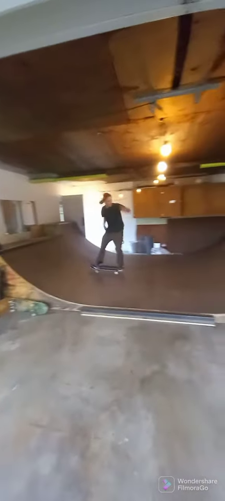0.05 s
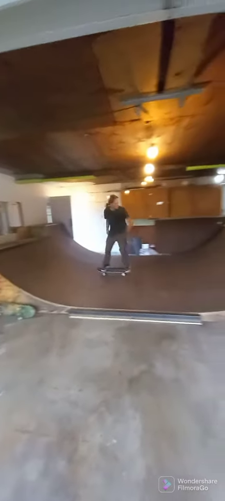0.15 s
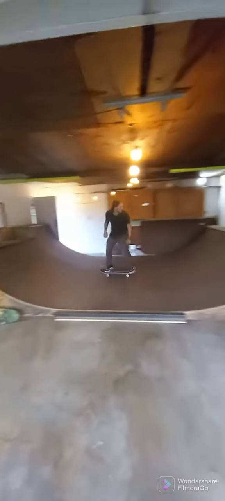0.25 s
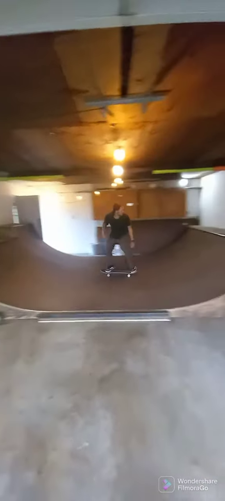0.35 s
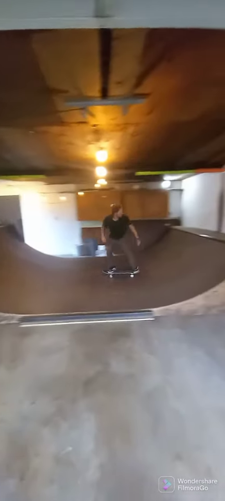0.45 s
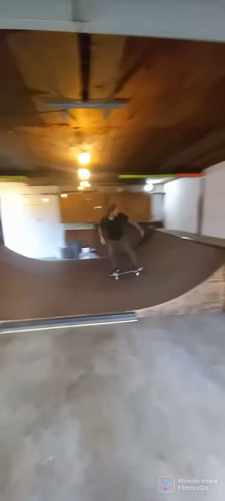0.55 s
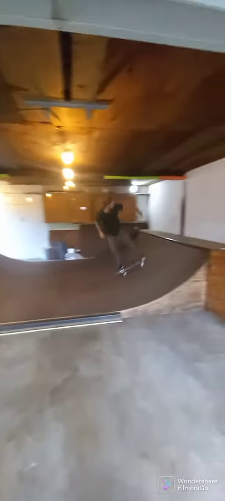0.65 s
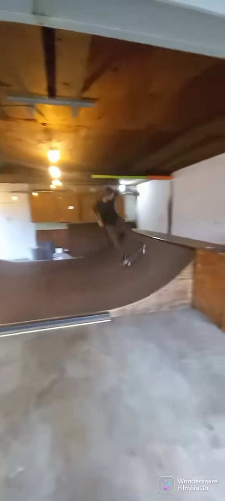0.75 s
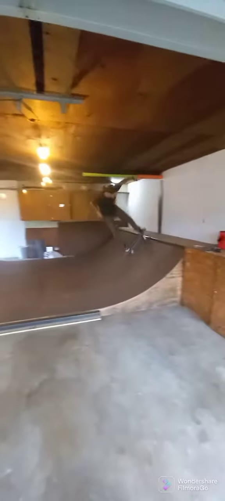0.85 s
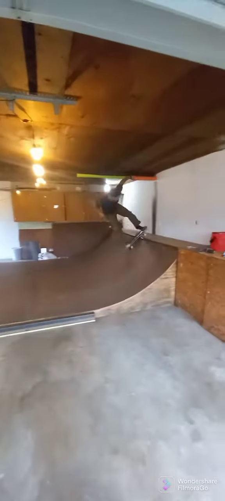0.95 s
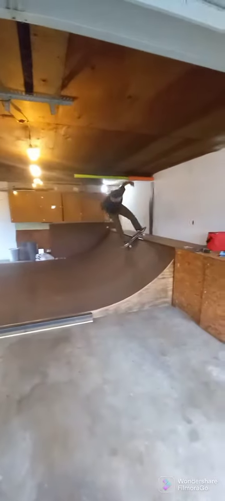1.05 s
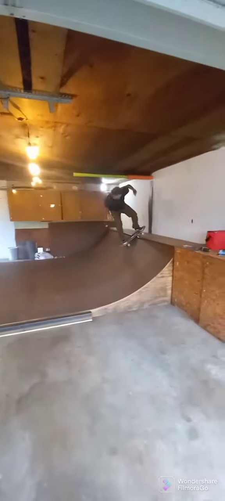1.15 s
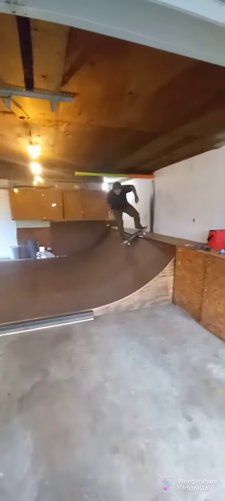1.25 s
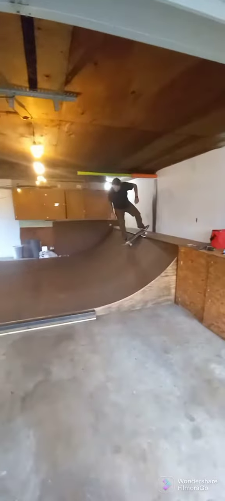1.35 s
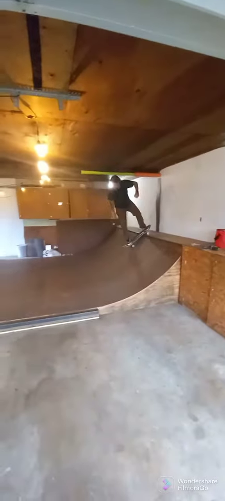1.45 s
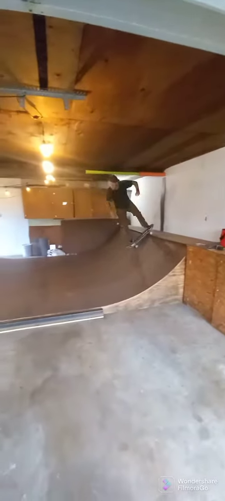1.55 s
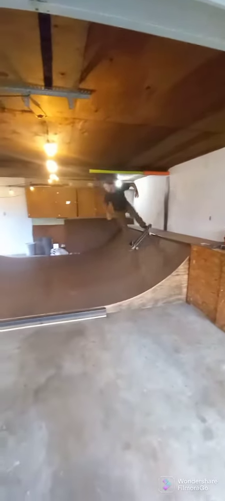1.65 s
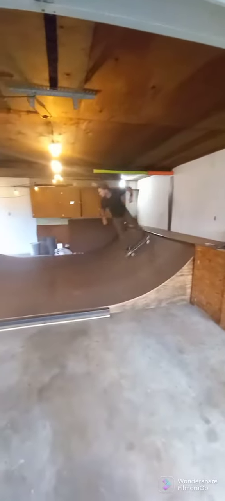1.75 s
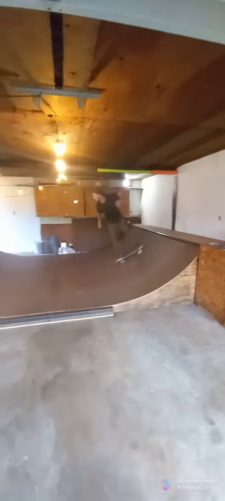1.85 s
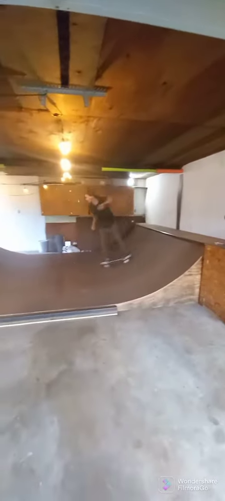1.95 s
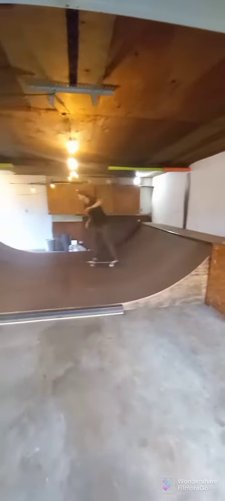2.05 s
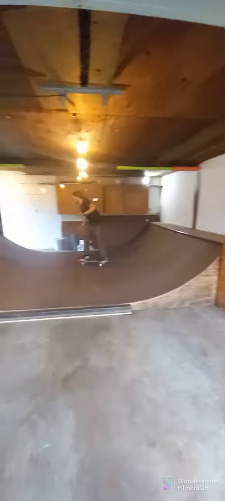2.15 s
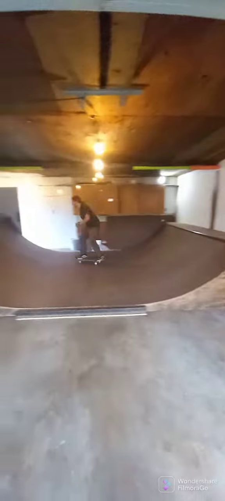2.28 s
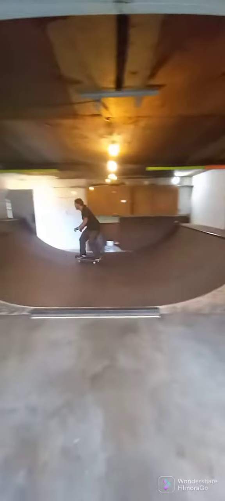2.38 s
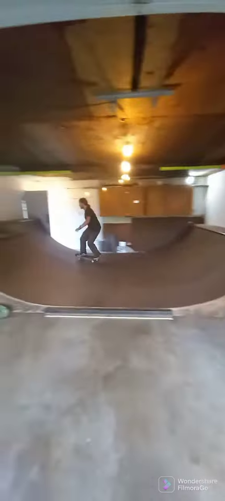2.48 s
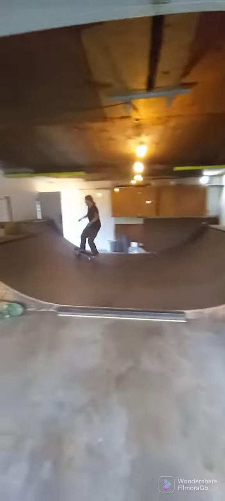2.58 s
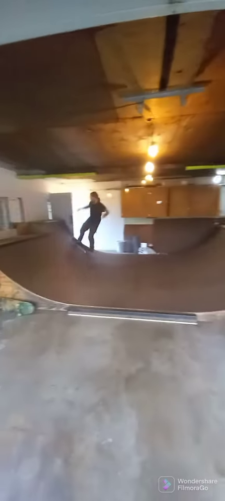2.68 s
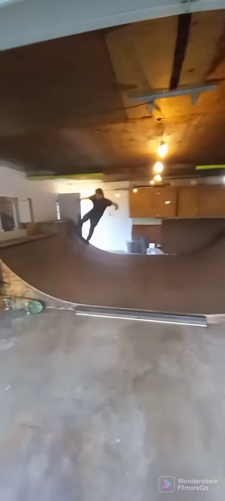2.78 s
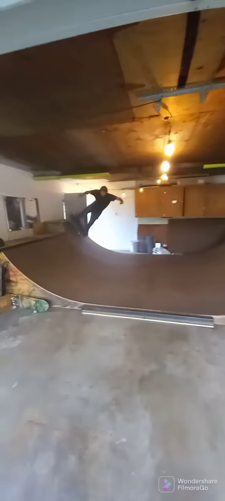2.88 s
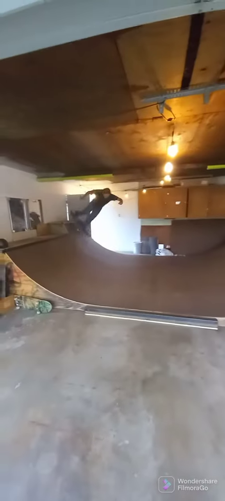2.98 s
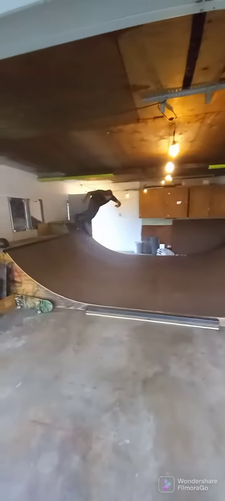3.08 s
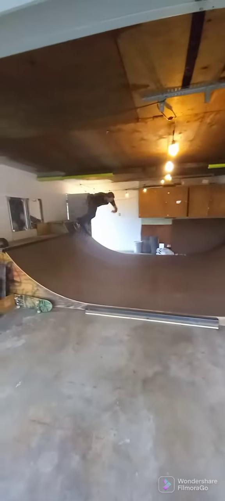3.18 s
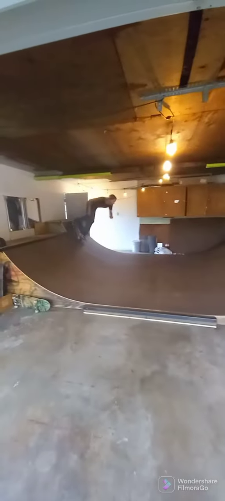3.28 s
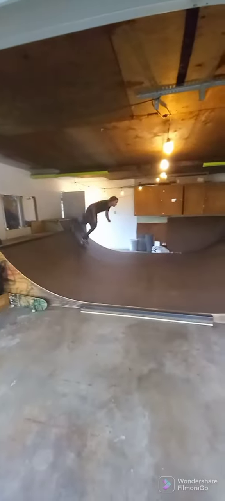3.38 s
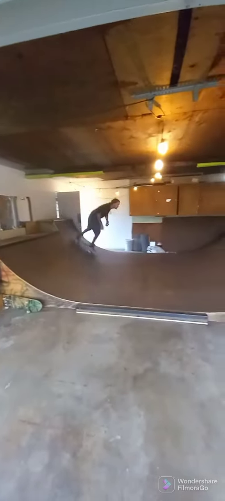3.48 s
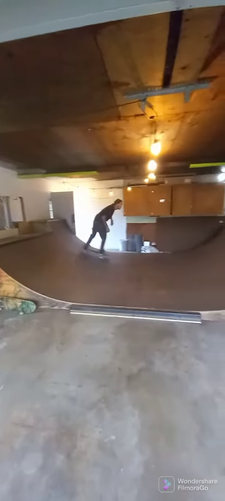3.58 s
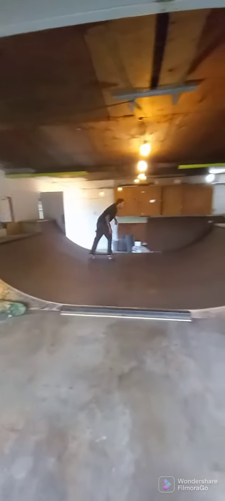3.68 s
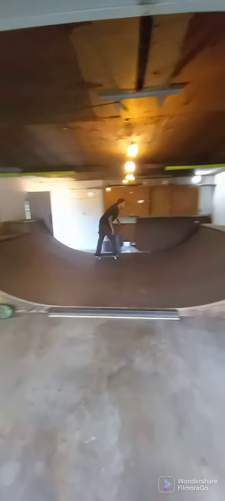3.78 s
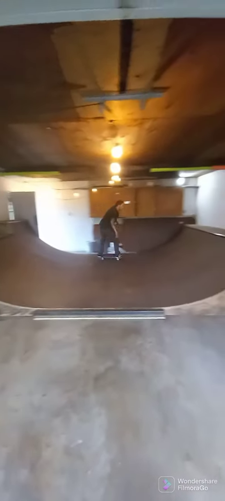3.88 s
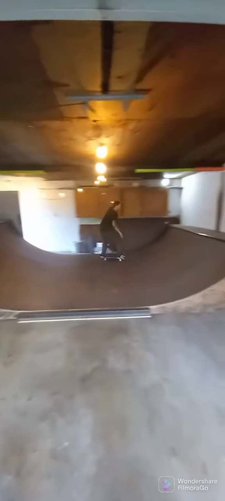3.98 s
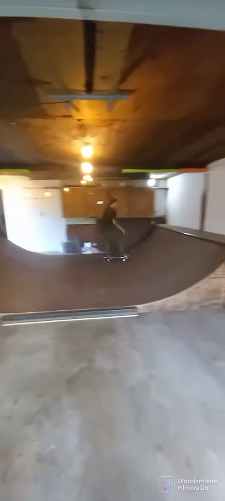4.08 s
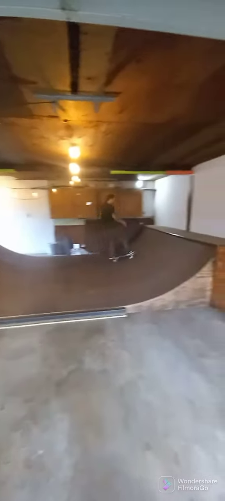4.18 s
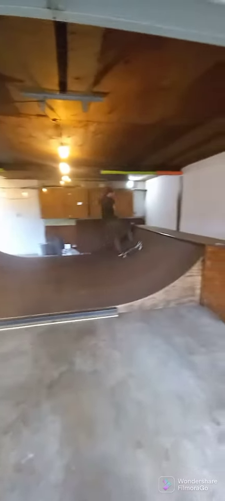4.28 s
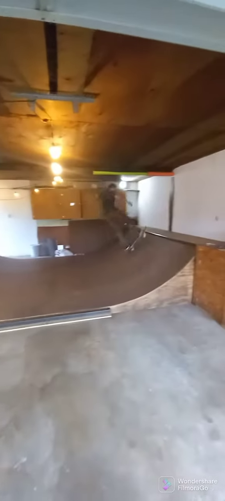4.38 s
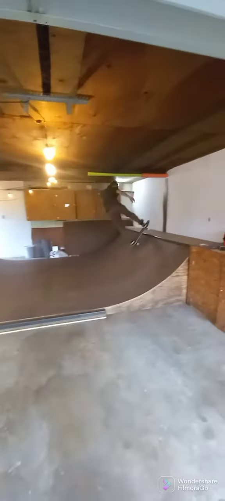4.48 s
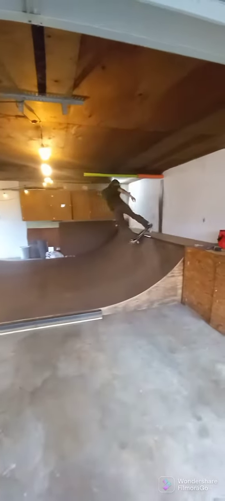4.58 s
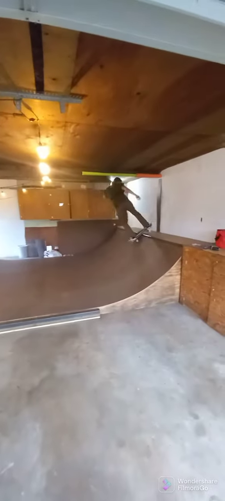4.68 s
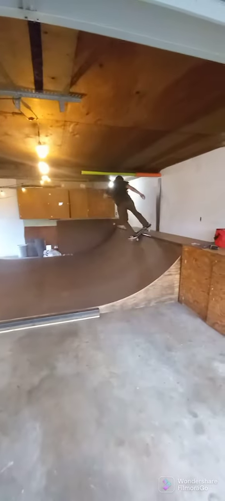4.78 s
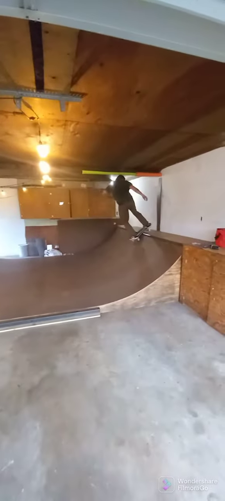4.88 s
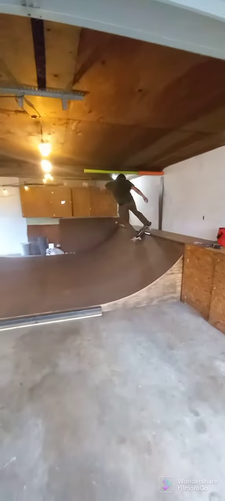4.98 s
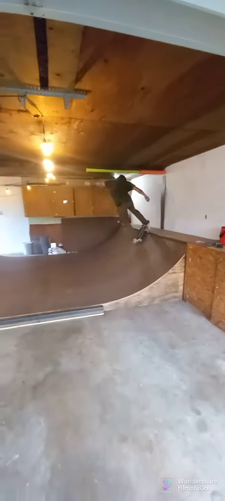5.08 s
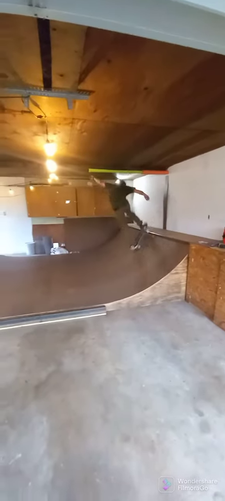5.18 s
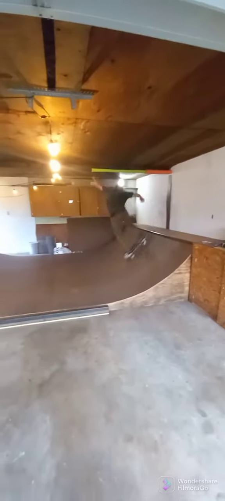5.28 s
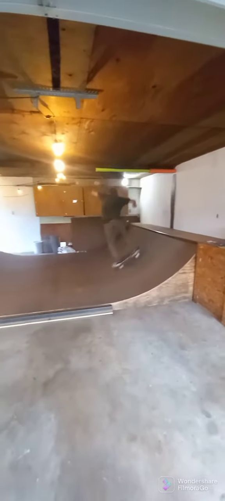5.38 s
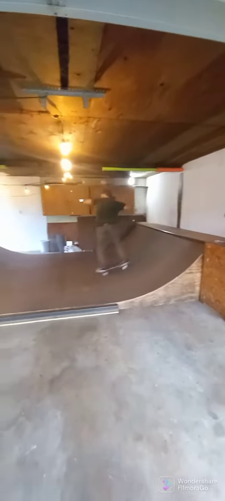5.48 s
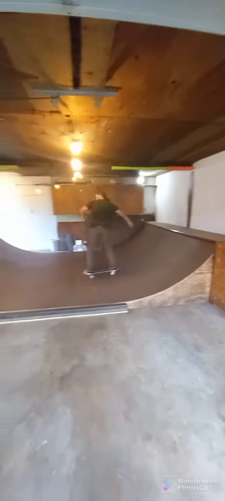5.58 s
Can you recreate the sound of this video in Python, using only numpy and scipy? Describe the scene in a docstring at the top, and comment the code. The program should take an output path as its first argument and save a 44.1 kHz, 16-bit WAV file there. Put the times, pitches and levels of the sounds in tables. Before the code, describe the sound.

In a garage with a short echo, a skateboard rides back and forth on a wooden ramp. Each pass is a deep, drumming rumble with a gritty hiss from the wheels. Three times the rolling breaks off at the edge, where the deck clacks and the metal axles crack against the steel rim or the wheels slap the wood. The board then lands and rolls on.

```python
"""Skateboard on a garage mini ramp

A skateboarder rides back and forth on a plywood ramp in a low garage. The wheels drum on the
hollow ramp and hiss over its skin. At each lip the trucks (metal axles) and the deck (the wooden
board) clack on the coping (the steel edge pipe), stall and drop back in. Hard walls answer every blow."""
import sys
import numpy as np
from scipy import signal
from scipy.fft import rfft, irfft, next_fast_len
from scipy.io import wavfile
from scipy.ndimage import uniform_filter1d

SR = 44100
rng = np.random.default_rng(int(sys.argv[2]) if len(sys.argv) > 2 else 0)


def unload_audio(sound):
    """Save the sound as a 16-bit wav file, at the path given as the first command line argument."""
    columns = np.transpose(np.atleast_2d(sound))
    # keep every value between -1 and 1, then stretch to whole-number steps
    steps = np.round(np.clip(columns, -1, 1) * 32767)
    wavfile.write(sys.argv[1], SR, steps.astype(np.int16))


N = 248283


# tone of dust crunching under the wheels: f/Hz, level/dB
GRIT_TONE = [(350, -31), (680, 3), (900, -2), (1200, -3), (1700, -5.5), (2400, -15.5), (4000, -27.5),
             (9000, -32)]
# tone of wheels hissing over the ramp: f/Hz, level/dB
HISS_TONE = [(1200, -14), (2400, -6), (3400, -3), (4300, -5), (5500, -6), (7000, -9), (8200, -14.5),
             (9300, -12), (10400, -17.5), (12200, -12), (16000, -20)]
# the wheels scrub sideways as the rider steers: middle t/s, half length/s, hiss level/dB
SIDE_SCRUBS = [(0.12, .05, -41.5), (0.588, 0.076, -40), (0.848, 0.099, -42.5), (1.463, 0.02, -50),
               (1.728, 0.042, -43.5), (2.024, 0.059, -41), (2.378, 0.19, -47), (2.736, 0.08, -35),
               (3.544, .08, -42.5), (3.806, 0.088, -38), (4.216, 0.067, -34.5), (4.43, 0.067, -39.5),
               (4.613, 0.099, -46.5), (4.866, 0.19, -47.5), (5.079, 0.028, -42), (5.613, 0.086, -45.5)]
def wheels():
    """The rolling wheels make the ramp rumble, while dust crunches and hisses under them."""
    boom_gain, rumble_gain, grit_gain, hiss_gain = rolling_gains()
    scrubs = sum(amp(db) * swell(s, half) for s, half, db in SIDE_SCRUBS)
    rumble = ramp_rumble(boom_gain, rumble_gain)
    grit = roll(tone_filter(GRIT_TONE), bumps_per_s=550, spread_db=1.5, echo_db=3.5, steady_s=0.06)
    hiss = roll(tone_filter(HISS_TONE), bumps_per_s=4000, spread_db=5.5, echo_db=2, steady_s=0.04)
    return rumble + grit_gain * grit + np.hypot(hiss_gain, scrubs) * hiss


# three crossings of the ramp, then two short rolls, each a list of points: t/s, rumble level/dB
RIDE_LEVELS = [
    [(0, -27.5), (.4, -31.5), (.7, -31), (.92, -30.5)],
    [(1.87, -31), (2.3, -30.5), (2.7, -23.5), (2.95, -24)],
    [(3.54, -29.5), (3.85, -26), (4.38, -27.5), (4.6, -35.5)],
    [(5.13, -33.5), (5.28, -28.5)],
    [(5.45, -27.5), (5.62, -25)],
]
def rolling_gains(rise_s=0.37, easy_roll_db=-28):
    """Boom, rumble, grit and hiss swell as the wheels land, follow the ride and fade as they lift."""
    t = np.arange(N) / SR
    # each sound: level in an easy roll/dB, dB gained per dB of the ride, time to fade by 60 dB/s
    boom, rumble, grit, hiss = (-25, 0.78, 0.86), (-27, 1.35, 0.55), (-38.5, 0.67, 1), (-46, 1, 1)
    base_db, follows, fall_s = np.transpose([boom, rumble, grit, hiss])[:, :, None]
    gains = []
    for ride in RIDE_LEVELS:
        s, db = np.transpose(ride)
        fade_db = -60 * (np.maximum(s[0] - t, 0) / rise_s + np.maximum(t - s[-1], 0) / fall_s)
        gains.append(amp(base_db + follows * (np.interp(t, s, db) - easy_roll_db) + fade_db))
    return np.max(gains, axis=0)


# tone of plywood under slow wheels: f/Hz, level/dB
SLOW_TONE = [(90, -46), (145, 3), (175, 8), (210, 1.5), (248, 5), (285, -3), (345, -3), (450, -33),
             (580, -11.5), (760, -27.5), (1200, -35), (3000, -89)]
# the higher tone of plywood under fast wheels: f/Hz, level/dB
FAST_TONE = [(110, -36), (170, -6.5), (250, -8.5), (345, 5.5), (420, -3), (520, -4.5), (620, -11),
             (780, -15.5), (1200, -36), (3000, -85.5)]
# the rider presses down and the rumble surges, deeper in the curves than on the flat:
# middle t/s, half length/s, level/dB, share of the fast tone (0-1)
PRESSES = [(0.137, .035, -22, 0.76), (0.662, 0.17, -23.5, 0.2), (2.088, 0.063, -24, .6),
           (2.186, 0.071, -26.5, 0.24), (2.633, 0.085, -20, 0), (2.81, .08, -23, 0.3),
           (3.715, 0.054, -26, 0.37), (4.045, 0.033, -21.5, .85), (4.284, 0.11, -20, 0.23),
           (5.203, 0.028, -25, 1), (5.534, 0.048, -23.5, 0.9)]
def ramp_rumble(boom_gain, rumble_gain, easy_fast_share=0.49):
    """Long bumps boom in the hollow ramp and shorter ones rumble in its sheets; pressing adds to both."""
    surges = [amp(db) * swell(s, half) for s, half, db, _ in PRESSES]
    power = np.array([rumble_gain] + surges) ** 2
    fast_share = np.array([easy_fast_share] + [press[-1] for press in PRESSES])
    surge_boom = amp(-8) * np.sqrt(power[1:].sum(axis=0))
    slow = roll(tone_filter(SLOW_TONE), bumps_per_s=210, spread_db=8.5, echo_db=-3, steady_s=0.081)
    fast = roll(tone_filter(FAST_TONE), bumps_per_s=380, spread_db=3.5, echo_db=1, steady_s=0.082)
    boom = roll(hollow_ramp, bumps_per_s=180, spread_db=5, echo_db=-4.5, steady_s=0.085)
    return (np.hypot(boom_gain, surge_boom) * boom
            + np.sqrt((1 - fast_share) @ power) * slow
            + np.sqrt(fast_share @ power) * fast)


def roll(response, bumps_per_s, spread_db, echo_db, steady_s, spots=20):
    """Wheels hit random bumps that shake the ramp; the rider's weight keeps the average force even."""
    lead = SR // 4  # lets the echo build up before the sound starts
    n = N + lead
    bumps = (rng.random(n) < bumps_per_s / SR) * rng.choice([-1, 1], n)
    bumps = bumps * amp(spread_db * rng.standard_normal(n))
    echo = np.zeros((2, n + SR))
    for spot in np.array_split(np.arange(n), spots):  # every spot of the ramp has its own echo
        add(echo, spot[0] / SR, signal.fftconvolve(bumps[spot][None], garage_echo(), axes=1))
    direct = np.array([bumps, bumps * rng.choice([-1, 1], n)])  # bumps come from either side
    sound = filtered(stereo(direct + amp(echo_db) * echo[:, :n]), response)[:, lead:]
    power = uniform_filter1d(np.mean(sound ** 2, axis=0), int(steady_s * SR))
    return sound / np.sqrt(np.abs(power) + 1e-20)


# the low notes of the hollow ramp: f/Hz, width/Hz, level/dB
RAMP_NOTES = [(50.5, 34, -50), (70.4, 18.2, -6.5), (89.45, 8.6, 0.5), (108.5, 17.2, 1), (121.8, 46.5, -7)]
def hollow_ramp(hz):
    """A filter: the ramp's air and panels boom at a few low notes and pass little else."""
    notes = sum((-1) ** k * amp(db) * 1j * hz * width / (centre ** 2 - hz ** 2 + 1j * hz * width)
                for k, (centre, width, db) in enumerate(RAMP_NOTES))
    return notes * tone_filter([(20, -12), (45, 0), (160, 0), (500, -25)])(hz)


# tone of a knock on plywood: f/Hz, level/dB
KNOCK_TONE = [(60, -63), (105, -3), (160, 1.5), (240, 3.5), (340, 2.5), (450, -2.5), (560, -10),
              (800, -31.5), (2000, -40.5)]
# tone of the deck's clack: f/Hz, level/dB
CLACK_TONE = [(300, -38.5), (560, 5.5), (700, 5.5), (800, 1), (900, -0.5), (1080, 0), (1400, -6),
              (1900, -10), (2800, -18), (6000, -34)]
# tone of a truck's crack: f/Hz, level/dB
CRACK_TONE = [(900, -28), (1400, 7), (1850, 3.5), (2350, 4), (2700, 0), (3400, -2.5), (4800, -4),
              (6500, -10), (8000, -18.5), (12000, -53)]
# tone of the tick of a hard hit: f/Hz, level/dB
TICK_TONE = [(3000, -8), (6500, 5.5), (8200, 1.5), (9300, 2), (10500, -2.5), (12500, 4.5), (16000, -5.5)]
# ringing notes of the maple deck: f/Hz, level/dB, time to fade by 60 dB/s
DECK_NOTES = [(520.6, -9, 0.9), (590.4, 1, 0.24), (640, -1.5, 0.17), (753, -8, 0.56), (770, -4, 0.49),
              (827, -17.5, 0.53), (1057, -14.5, 0.82)]
# ringing notes of the trucks: f/Hz, level/dB, time to fade by 60 dB/s
TRUCK_NOTES = [(1420, 8.5, 0.23), (1452, -45, 0.88), (1684, -5, 0.22), (1740, -17, 0.16), (1810, 7, 0.11),
               (2103, 6.5, 0.4), (2170, -13, 0.2), (2270, -32, 0.63), (2480, -4, 0.31), (2926, 8.5, 0.1),
               (3490, 3.5, 0.22), (4860, -2.5, 0.32), (6360, -39, 0.17)]
def blows():
    """Every blow sounds the ramp, its plywood, the deck and the trucks, each by its own amount."""
    out = np.zeros((2, N + SR))
    for s, boom_db, knock_db, clack_db, crack_db, tick_db in list_blows():
        # bright, hard hits stand out more from their echo
        direct_db = .8 * np.clip(crack_db - clack_db, -9, -2) - 2
        boom = strike(hollow_ramp, direct_db=-2)
        knock = strike(tone_filter(KNOCK_TONE), direct_db=-5, contact_s=0.013)
        deck = strike(tone_filter(CLACK_TONE), direct_db)
        deck += amp(-7) * ringing(DECK_NOTES, scatter_db=1.5, detune=.008)
        trucks = strike(tone_filter(CRACK_TONE), direct_db)
        trucks += amp(-13.5) * ringing(TRUCK_NOTES, scatter_db=3, detune=.0053)
        tick = strike(tone_filter(TICK_TONE), direct_db - 2)
        ramp = amp(boom_db - 1.5) * boom + amp(knock_db - 3) * knock
        board = amp(clack_db - 5.5) * deck + amp(crack_db - 4) * trucks + amp(tick_db - 2) * tick
        add(out, s, ramp + board)
    return out[:, :N]


# the board rocks on the lip and hits once: t/s, clack level/dB, then added to it: boom/dB, knock/dB,
# hardness/dB
LIP_TAPS = [(.987, -16, 0, -0.5, -4.5), (1.165, -31, 7.5, 0, 2), (1.433, -37, -3, 1, 7),
            (4.861, -32, -10, -5, -3), (4.933, -35.5, -1, 0, 3), (5.081, -27.5, 5.5, 4, 0.5),
            (5.182, -24.5, -1, 4, 0.5)]
# the board lands one axle after the other: the same columns as LIP_TAPS, then for the second axle:
# delay/s, level change/dB, extra weight/dB
AXLE_LANDINGS = [(.937, -12, -10.5, -6.5, -1, 0.022, -7, 8), (1.504, -32, 3.5, 2, -0.5, 0.02, -1, 2.5),
                 (1.666, -26, 1.5, -1.5, -2, 0.03, -1, -3), (1.764, -29, 1.5, 1.5, 3.5, .011, 5, 0),
                 (2.97, -16, -1.5, -6, -1.5, .023, -2.5, 5.5), (3.368, -16, -1.5, -6, 1, .018, -2.5, 9.5),
                 (5.304, -18, 5.5, 5.5, 0.5, .019, -6.5, 2)]
# a truck cracks on the coping, and a quieter copy of the blow follows at once: # t/s, crack level/dB, deck and
# ramp against it/dB, tick level/dB, repeat delay/s
TRUCK_HITS = [(1.047, -16, -3.5, -32, .013), (4.641, -15, 1, -43, .019)]
# the wheels thud over a joint or dent in the sheets: t/s, knock level/dB, boom level/dB
SHEET_JOINTS = [(.005, -20.5, -26), (.118, -22.5, -27.5), (.168, -30, -23), (0.685, -30, -24.5),
                (0.864, -24, -26), (2.418, -31.5, -20), (2.506, -21, -18), (2.624, -19.5, -28),
                (2.788, -16, -41), (2.912, -21, -20.5), (3.615, -31, -18), (3.839, -25, -42),
                (3.955, -23, -20), (4.377, -21.5, -18)]
def list_blows(repeat_db=-8):
    """List each blow's time and how hard it drives the boom, knock, clack, crack and tick, in dB."""
    rows = [slap(*tap) for tap in LIP_TAPS]
    for s, db, boom_db, knock_db, hard_db, delay, second_db, weight_db in AXLE_LANDINGS:
        rows.append(slap(s, db, boom_db, knock_db, hard_db))
        rows.append(slap(s + delay, db + second_db, boom_db + weight_db, knock_db + weight_db, hard_db))
    for s, db, body_db, tick_db, delay in TRUCK_HITS:
        wood_db = db + body_db
        levels = np.array([wood_db - 4.5, wood_db - 2.5, wood_db + .5, db, tick_db])
        rows += [(s, *levels), (s + delay, *(levels + repeat_db))]
    return rows + [(s, boom_db, db, db - 15, db - 19.5, db - 39) for s, db, boom_db in SHEET_JOINTS]


def slap(s, db, boom_db, knock_db, hard_db):
    """Wheels slap the ramp: weight makes it boom and knock, a hard hit makes it crack and tick."""
    return s, db + boom_db, db + knock_db, db, db + hard_db - 10, db + hard_db - 17


def strike(response, direct_db, contact_s=.0045, wall_s=.0135, burst_size=2048):
    """One hit: a short burst, its answer from the nearest wall and the echo that builds up."""
    echo = garage_echo()
    t = np.arange(echo.shape[1]) / SR
    sound = echo * (1 - .7 * np.exp(-t / wall_s))
    fade = np.exp(-t[:burst_size] / contact_s)
    for s, db in (0, direct_db), (wall_s, direct_db - 8):
        spectrum = rfft(rng.standard_normal((2, burst_size)) * fade)
        burst = irfft(spectrum / np.abs(spectrum)) * np.sqrt(fade)  # a blow drives all pitches evenly
        add(sound, s, amp(db) * unit(burst) / np.sqrt(burst_size))
    sound = filtered(stereo(sound), response)
    return sound / np.sqrt(np.mean(sound[:, :1764] ** 2))  # the first 40 ms set the level


# a truck clanks on the coping: t/s, level/dB
PIPE_HITS = [(0.939, -22), (0.958, -25)]
# ringing notes of the coping: f/Hz, level/dB, time to fade by 60 dB/s
PIPE_NOTES = [(873, 5, 0.32), (920, -15, 0.34), (1212, -2, 0.37), (1560, -12, 0.35)]
def coping_clanks():
    """The steel pipe rings when a truck hits it."""
    out = np.zeros((2, N))
    for s, db in PIPE_HITS:
        add(out, s, amp(db) * ringing(PIPE_NOTES, scatter_db=-1, detune=.0028))
    return out


def ringing(notes, scatter_db, detune, size=28000):
    """A struck part rings at new strengths each time; the rider's load shifts its notes a little."""
    t = np.arange(size) / SR
    hz, db, fade_s = np.transpose(notes)[:, :, None]
    hz = hz * (1 + detune * rng.standard_normal(hz.shape))
    strength = amp(db + scatter_db * rng.standard_normal((2, len(notes), 1)))
    phase = 2 * np.pi * rng.random((len(notes), 1)) + rng.standard_normal((2, len(notes), 1))
    return np.sum(strength * amp(-60 * t / fade_s) * np.sin(2 * np.pi * hz * t + phase), axis=1)


def wheel_squeak(pitch_hz=765, waver_hz=35.7, level_db=-28.5):
    """A wheel sticks and slips on the plywood as the board turns back in: a short, shaky tone."""
    hz = pitch_hz + waver_hz * unit(uniform_filter1d(rng.standard_normal(N), size=200))
    tone = swell(middle_s=1.705, half_s=.018) * np.sin(2 * np.pi * np.cumsum(hz) / SR)
    echo = signal.fftconvolve(tone[None], garage_echo(), axes=1)[:, :N]
    return amp(level_db) * (tone + amp(-8) * echo)


# how long the garage echoes: f/Hz, time to fade by 60 dB/s
ECHO_TIMES = [(60, 0.48), (170, 0.31), (400, 0.38), (1000, 0.38), (2500, 0.48), (6000, 0.46), (10000, 0.34),
              (16000, 0.29)]
def garage_echo(size=28000):
    """A fresh echo off the hard walls: noise in which each pitch dies away at its own speed."""
    hz, t, noise = signal.stft(rng.standard_normal((2, size)), SR, nperseg=256)
    fade = amp(-60 * t / read_curve(ECHO_TIMES, hz)[:, None])
    tail = signal.istft(noise * fade, SR, nperseg=256)[1][:, :size]
    return unit(tail) / np.sqrt(size)


# tone of the still room: f/Hz, level/dB
AIR_TONE = [(25, -4.5), (80, 3), (200, -26), (800, -7.5), (2500, -17.5), (8000, -32.5), (16000, -35)]
def room_air(level_db=-49.5):
    """Faint, steady air in the garage."""
    noise = stereo(rng.standard_normal((2, N)))
    return amp(level_db) * unit(filtered(noise, tone_filter(AIR_TONE)))


# how alike left and right sound: f/Hz, likeness (1 = the same, 0 = unrelated)
STEREO_LIKENESS = [(90, .99), (180, .97), (260, .75), (500, .3), (1000, 0), (4000, -.05), (12000, 0)]
def stereo(pair):
    """Blend two unrelated signals into a left and a right that are alike only in the bass."""
    def shares(hz):
        angle = np.arccos(np.clip(read_curve(STEREO_LIKENESS, hz), -.99, .99)) / 2
        return np.array([np.cos(angle), np.sin(angle)])
    mid, side = filtered(pair, shares)
    return np.array([mid + side, mid - side])


def tone_filter(points):
    """Make a filter from (f/Hz, level/dB) points that rings after a hit, never before it."""
    def response(hz):
        cepstrum = irfft(np.log(amp(read_curve(points, hz))))  # the tone curve laid out in time
        half = len(cepstrum) // 2
        cepstrum[1:half] *= 2  # move the part before the hit to after it
        cepstrum[half + 1:] = 0
        return np.exp(rfft(cepstrum))
    return response


def filtered(x, response):
    """Turn each frequency of x up or down as response(hz) says."""
    n = x.shape[-1]
    padded = next_fast_len(n + 8192)
    return irfft(rfft(x, padded) * response(np.fft.rfftfreq(padded, 1 / SR)), padded)[..., :n]


def read_curve(points, hz):
    """Read between (f/Hz, value) points, with octaves evenly spaced."""
    f, values = np.transpose(points)
    return np.interp(np.log(hz + 1), np.log(f), values)


def swell(middle_s, half_s):
    """A smooth rise to 1 and fall."""
    return np.exp(-((np.arange(N) / SR - middle_s) / half_s) ** 2)


def add(out, s, sound):
    """Mix a sound into out, starting at s seconds."""
    out[:, round(s * SR):][:, :sound.shape[1]] += sound


def amp(db):
    """Turn decibels into a gain."""
    return 10 ** (np.asarray(db) / 20)


def unit(x):
    """Scale to an average (rms) level of 1."""
    return x / np.sqrt(np.mean(x ** 2) + 1e-20)


def scene():
    """Rolling, blows, clanks, one squeak and the room's air."""
    return wheels() + blows() + coping_clanks() + wheel_squeak() + room_air()


# balance of the two sides: f/Hz, left minus right level/dB
SIDE_BALANCE = [(60, -0.5), (130, -0.4), (250, -1.5), (500, -0.9), (1000, -1), (4000, -2), (8000, 0.5),
                (12000, -0.2)]
def record(dry, top_hz=16200):
    """Give left and right slightly different tones, round off the peaks and cut the highest treble."""
    balanced = filtered(dry, lambda hz: amp(np.outer([.5, -.5], read_curve(SIDE_BALANCE, hz))))
    rounded = balanced / (1 + np.abs(balanced) ** 8) ** (1 / 8)
    return filtered(rounded, lambda hz: hz < top_hz)


dry = scene()
out = record(dry)
unload_audio(out)
```